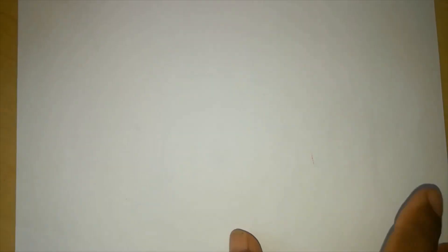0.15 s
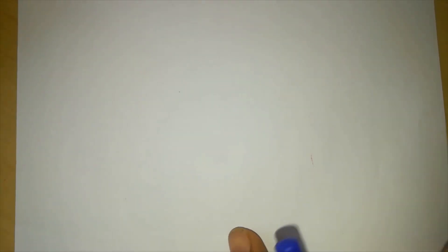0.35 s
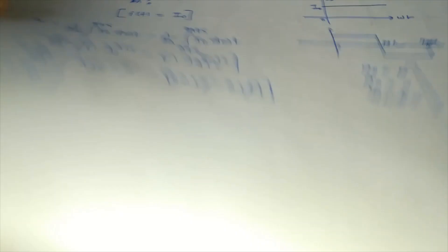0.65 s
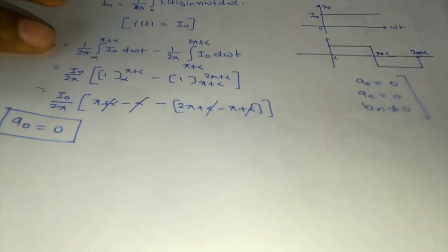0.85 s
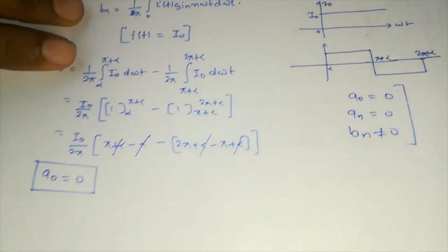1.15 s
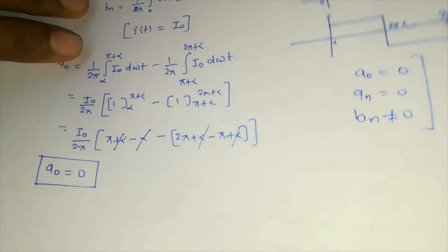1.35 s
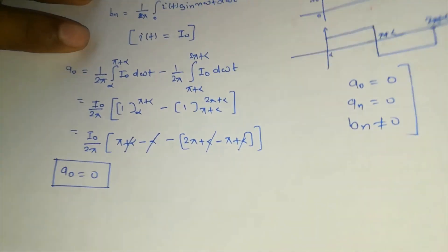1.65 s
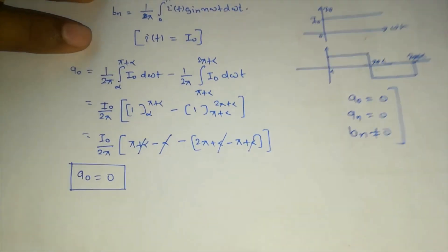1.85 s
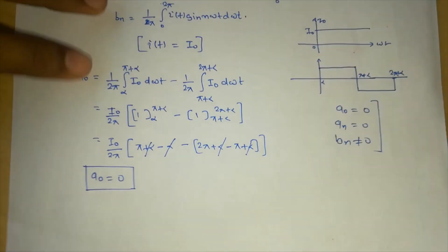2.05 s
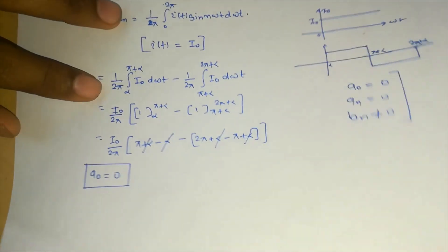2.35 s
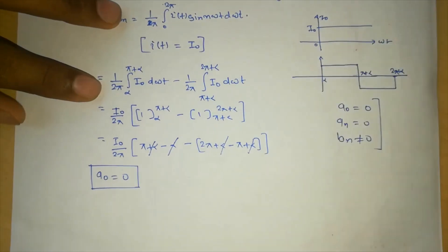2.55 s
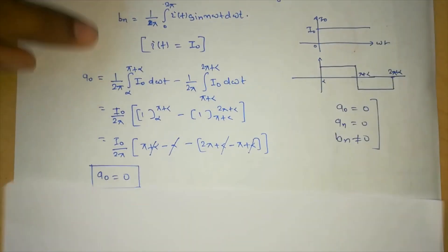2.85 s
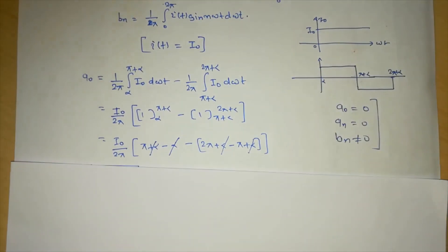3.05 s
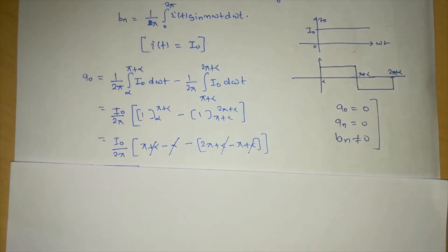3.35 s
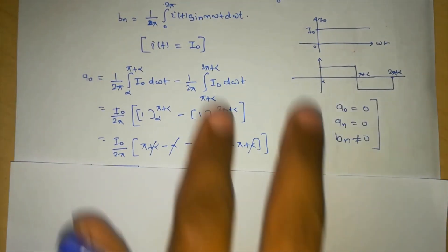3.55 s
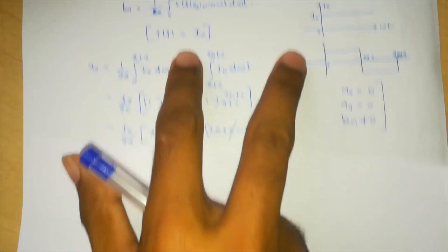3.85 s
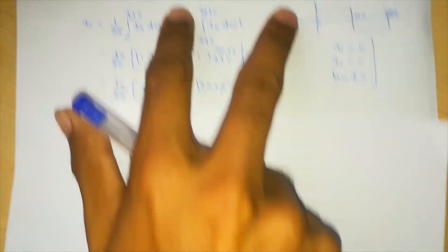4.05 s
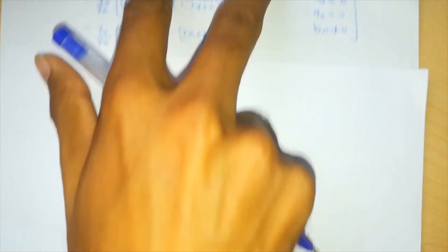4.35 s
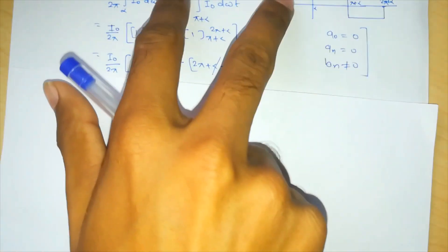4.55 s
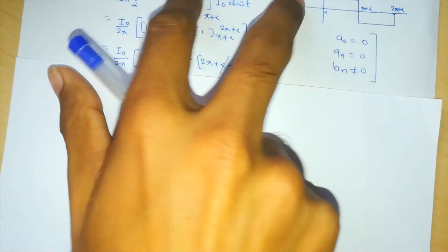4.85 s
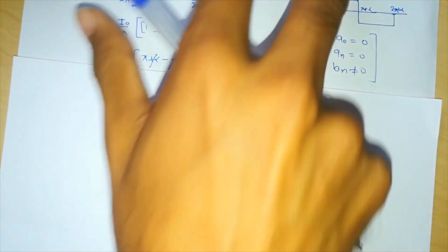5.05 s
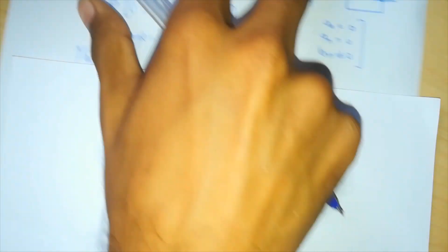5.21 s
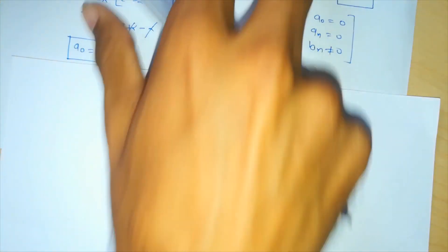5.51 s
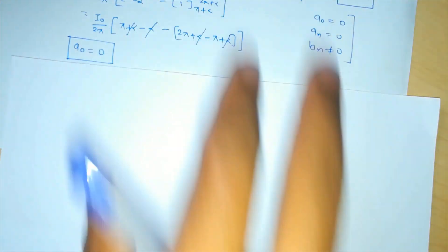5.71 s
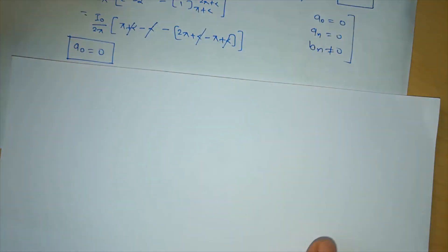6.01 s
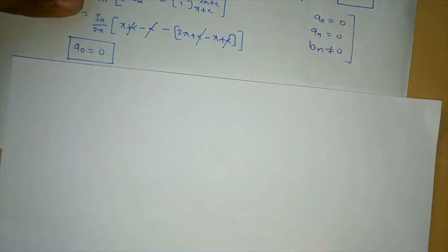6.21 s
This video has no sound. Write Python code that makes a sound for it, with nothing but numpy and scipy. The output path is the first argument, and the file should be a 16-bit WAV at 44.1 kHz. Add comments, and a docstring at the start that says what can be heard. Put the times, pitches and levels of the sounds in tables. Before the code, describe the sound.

A sheet of paper slides and rustles over other pages on a desk, with crisp snaps and a few dull knocks.

```python
"""A desk in a quiet room, close up: a hand slides a sheet of paper over other pages.
Fibres catch and let go as a grainy hiss, and the sheet buckles with sharp snaps. At first it wobbles
in the air and squeaks under a finger; later fingertips brush the page. The desk knocks and rumbles
dully, and a low room hum and the microphone's own hiss lie beneath."""
import sys
import numpy as np
from scipy import signal
from scipy.io import wavfile
from scipy.ndimage import uniform_filter1d

SR = 44100
rng = np.random.default_rng(int(sys.argv[2]) if len(sys.argv) > 2 else 0)


def put_to_file(sound):
    """Save the sound as 16-bit audio at rate SR, in the file named by the first command-line argument."""
    columns = np.atleast_2d(sound).T  # one column per channel
    safe = np.clip(columns, -1, 1)
    whole_steps = np.round(safe * 32767)
    wavfile.write(sys.argv[1], SR, whole_steps.astype(np.int16))


N = 281181


def amp(db):
    """Decibels to gain."""
    return 10 ** (np.asarray(db) / 20)


def unit_rms(x):
    """Scales to rms 1."""
    return x / np.sqrt(np.mean(x ** 2) + 1e-20)


def curve_at(points, hz):
    """Reads a table of (frequency, value) on a log-frequency axis."""
    point_hz, value = np.transpose(points)
    return np.interp(np.log(hz + 1), np.log(point_hz + 1), value)


def impulse_response(spectrum):
    """Minimum-phase filter of energy 1, falling to -80 dB an octave outside the spectrum table."""
    closed = [(spectrum[0][0] / 2, -80)] + list(spectrum) + [(spectrum[-1][0] * 2, -80)]
    log_gain = np.log(amp(curve_at(closed, abs(np.fft.fftfreq(4096, 1 / SR)))))
    phase = -signal.hilbert(log_gain).imag
    taps = np.fft.ifft(np.exp(log_gain + 1j * phase)).real[:1024]
    return taps / np.linalg.norm(taps)


def add(mix, start, sound):
    """Mixes a sound in at start seconds."""
    part = mix[round(start * SR):][:len(sound)]
    part += sound[:len(part)]


def drift(samples):
    """Smooth random wandering of rms 1; more samples make it slower."""
    return unit_rms(uniform_filter1d(uniform_filter1d(rng.standard_normal(N), samples), samples))


def resonate(x, hz, width_hz):
    """A resonance that can glide: shifts hz down to zero, smooths, and shifts back."""
    carrier = np.exp(2j * np.pi * np.cumsum(hz * np.ones(len(x))) / SR)
    pole = np.exp(-np.pi * width_hz / SR)
    return 2 * (carrier * signal.lfilter([1 - pole], [1, -pole], x / carrier + 1e-18)).real


def envelope(start, length, first_db, last_db):
    """Gain with a fast attack, a ramp from one level to another and a slower release."""
    attack_db_per_s, release_db_per_s = 2500, 500.5
    t = np.arange(N) / SR - start
    held_db = first_db + (last_db - first_db) * np.clip(t / length, 0, 1)
    fade_db = attack_db_per_s * np.maximum(-t, 0) + release_db_per_s * np.maximum(t - length, 0)
    return amp(held_db - fade_db)


# Colour of the background bed: (frequency [Hz], relative level [dB])
ROOM_SPECTRUM = [(15, -23), (30, -3.5), (80, -0.5), (130, -3.5), (290, -12.5), (500, -20.5), (900, -21),
                 (2000, -25.5), (5000, -30), (6400, -33), (7400, -39.5), (10000, -36.5), (14500, -33.5),
                 (16000, -34.5)]


def room_tone():
    """Low room noise and microphone hiss, gently swelling and fading in patches of the spectrum."""
    frames, hz = N // 512 + 5, np.fft.rfftfreq(2048, 1 / SR)
    real, imag, patches = rng.standard_normal((frames, len(hz), 3)).T
    patches_db = 1.8 * unit_rms(uniform_filter1d(uniform_filter1d(patches, 14, 0), 8, 1))
    spectra = (real + 1j * imag) * amp(curve_at(ROOM_SPECTRUM, hz)[:, None] + patches_db)
    bed = signal.istft(spectra, nperseg=2048, noverlap=1536)[1][:N]
    return amp(-60.5) * unit_rms(bed)


# Swells of a faint hum: (time [s], length [s], start level [dB], end level [dB])
HUM_SWELLS = [(1.445, 0.19, -67.5, -66), (1.914, 0.32, -62.5, -68.5), (2.949, 0.51, -72.5, -73),
              (3.75, 0.11, -76, -62.5)]


def hum():
    """A low, narrow band of noise that wavers, coming and going."""
    band = unit_rms(resonate(rng.standard_normal(N), hz=278, width_hz=25))
    return sum(envelope(*row) for row in HUM_SWELLS) * band


# The room's reverb: (frequency [Hz], time to fall by 60 dB [s])
REVERB_DECAY = [(500, 0.17), (1500, 0.2), (5000, 0.23), (12000, 0.61)]


def reverb(send):
    """A diffuse tail that starts after 10 ms, each band dying at its own speed."""
    hz, t, spectra = signal.stft(rng.standard_normal(SR // 2), SR, nperseg=256)
    decay_s = np.maximum(curve_at(REVERB_DECAY, hz), 0.05)
    tail = signal.istft(spectra * amp(-60 * t / decay_s[:, None]), SR, nperseg=256)[1]
    delayed_tail = np.concatenate([np.zeros(440), tail / np.linalg.norm(tail)])
    return signal.fftconvolve(send, delayed_tail)[:N]


# Knocks on the desk top: (time [s], level [dB], pitch [Hz])
DESK_KNOCKS = [(0.141, -30, 245), (0.227, -23, 189), (0.313, -27, 470), (0.412, -36.5, 252),
               (0.571, -37.5, 484), (0.671, -36.5, 310), (0.714, -34, 537), (0.895, -38.5, 299),
               (3.348, -49.5, 444), (3.864, -33, 687), (3.822, -37, 710), (3.83, -46, 168),
               (3.867, -42.5, 270), (5.077, -46.5, 205.5), (5.626, -50, 456)]
# Rumble under the pages: (time [s], length [s], start level [dB], end level [dB])
DESK_RUMBLES = [(0.0, 0.048, -49, -62), (0.24, 0.33, -46, -61), (0.638, .85, -49, -61),
                (3.82, .1, -52.5, -59), (6.0, .25, -56.5, -64)]


def desk():
    """Each knock is one damped tone; the desk and the air under the dragged pages rumble."""
    knocks, t = np.zeros(N), np.arange(4000) / SR
    attack = 1 - np.exp(-t / 0.00083)
    for start, db, hz in DESK_KNOCKS:
        add(knocks, start, amp(db - 60 * t / 0.045) * attack * np.sin(2 * np.pi * hz * t))
    low_band = signal.butter(2, (25, 125), "band", fs=SR, output="sos")
    rumble = unit_rms(signal.sosfilt(low_band, rng.standard_normal(N)))
    return knocks + sum(envelope(*row) for row in DESK_RUMBLES) * rumble


# Wobble of the lifted sheet: (time [s], level [dB], pitch [Hz])
WOBBLE_CURVE = [(0.08, -62, 215.3), (0.142, -44.5, 221.6), (0.204, -51, 189.7), (0.23, -46, 185),
                (0.264, -42.5, 180), (0.328, -44, 179.4), (0.38, -55.5, 158), (0.414, -55, 204.2),
                (0.45, -45, 215.7)]


def wobble():
    """A bending mode and its fifth, shaken unevenly; the pitch follows the curve of the sheet."""
    times, db, hz = np.transpose(WOBBLE_CURVE)
    t = np.arange(N) / SR
    fade = np.clip(np.minimum(t - times[0], times[-1] - t) / 0.01, 0, 1)
    pitch_hz = np.interp(t, times, hz) * (1 + 0.16 * drift(330))
    phase = 2 * np.pi * np.cumsum(pitch_hz) / SR
    tone = unit_rms(np.sin(phase) + 0.5 * np.sin(1.5 * phase))
    level_db = np.interp(t, times, db) + 2.5 * drift(390)
    return fade * amp(level_db) * tone


# Squeaks of the taut sheet: (time [s], length [s], start level [dB], end level [dB], pitch [Hz])
FINGER_SQUEAKS = [(0.005, 0.018, -41.5, -54.5, 2520), (0.044, 0.031, -48, -49, 2570),
                  (0.71, 0.03, -38.5, -44, 2790)]


def fingers():
    """One bright brush of skin on paper, and stick-slip squeaks with their octave."""
    sheen = resonate(rng.standard_normal(N), hz=12300, width_hz=2200)
    sheen = unit_rms(resonate(sheen, hz=11500, width_hz=2200))
    out = envelope(start=3.45, length=0.19, first_db=-68, last_db=-67) * sheen
    for *gesture, hz in FINGER_SQUEAKS:
        slip = rng.standard_normal(N)
        fundamental = unit_rms(resonate(slip, hz, width_hz=90.8))
        octave = unit_rms(resonate(slip, 2 * hz, width_hz=160))
        out += envelope(*gesture) * (fundamental + 0.53 * octave)
    return out


def flex(x, depth_db):
    """The bending sheet's resonances drift: brief patches in time and pitch swell or fade."""
    _, _, spectra = signal.stft(x, SR, nperseg=512, noverlap=384)
    patches = rng.standard_normal(spectra.shape)
    patches = unit_rms(uniform_filter1d(uniform_filter1d(patches, 4, 0), 14, 1))
    return signal.istft(spectra * amp(depth_db * patches), SR, nperseg=512, noverlap=384)[1][:N]


# The paper's voices, dark to bright: loose area, pressed middle, rubbing edge and fibre fizz.
# Each is (frequency [Hz], relative level [dB])
LOOSE_SPECTRUM = [(350, -14), (550, -12), (700, -4), (850, -6.5), (1050, -1.5), (1250, -5.5), (1700, -5),
                  (2300, -14.5)]
MIDDLE_SPECTRUM = [(1300, -29), (1900, -6.5), (2500, -1), (3200, 0.5), (3800, -4), (4800, -31.5)]
EDGE_SPECTRUM = [(2500, -22), (3500, -5.5), (4200, -0.5), (4870, 0), (5500, -2), (6150, -4.5), (6700, -10),
                 (7200, -14.5), (7800, -33.5), (9000, -47.5)]
FIZZ_SPECTRUM = [(6500, -17.5), (7800, -2.5), (9000, -6), (10000, -1), (11500, -5), (13500, -7),
                 (14800, -6), (16000, -12.5)]
# Strokes of the sheet, several in a row for a long slide: (time [s], length [s], edge start level [dB],
# edge end level [dB], middle [dB re edge], loose [dB re edge], fizz [dB re edge], edge pitch [Hz])
SLIDE_STROKES = [(0.0, .04, -48, -53, -2.5, 4.5, -31, 5000),
                 (0.045, 0.05, -42.5, -41, -8.5, -11, -30, 4800),
                 (0.111, 0.15, -43, -54, -7.5, -3, -21, 5100), (0.275, 0.041, -46, -46, -9, 2, -14, 5000),
                 (0.312, 0.049, -36, -40, -0.5, 5, -18.5, 4890),
                 (0.39, .07, -39.5, -45.5, -2, -6, -18, 4410),
                 (0.465, 0.036, -46, -53, 1.5, -6.5, -35, 4350),
                 (0.513, .145, -49, -43.5, -1, -1, -23.5, 4600),
                 (0.666, .05, -38.5, -42, -3, -4, -22, 4810), (0.719, 0.062, -32, -38, -5.5, -7, -23, 5550),
                 (0.8, .06, -50.5, -61, -1.5, -3, -30, 5100), (0.863, 0.11, -46, -53.5, -2, -11, -29, 5100),
                 (0.965, 0.092, -38.5, -31, -9, -10.5, -22, 4800),
                 (1.065, .1, -29.5, -26, -10.5, -14, -20, 4850),
                 (1.165, 0.051, -24.5, -22.5, -17, -19, -24, 5600),
                 (1.23, 0.049, -34.5, -41.5, -7, -13, -15.5, 5100),
                 (1.289, 0.066, -38, -35.5, -7.5, -18.5, -17.5, 4870),
                 (1.377, 0.081, -37, -42.5, -7.5, -19, -22, 4910),
                 (1.47, .39, -55, -60.5, -5, -9.5, -17, 4880),
                 (1.868, .07, -56, -55.5, -1, -8.5, -19, 4720),
                 (1.985, 0.28, -63, -78, -1.5, -5, -13, 4700),
                 (2.047, .05, -53, -58.5, -1.5, -7, -22.5, 4800),
                 (2.44, .12, -58.5, -59.5, -20, -10, -17, 5360), (2.6, .07, -70, -71, -8, -7, -12, 5200),
                 (2.642, .035, -66, -72, 0, 15.5, -15, 5000), (2.753, .03, -63.5, -71, 5.5, 0, -10.5, 5190),
                 (3.33, .155, -68, -52.5, -11, -14.5, -16, 5610),
                 (3.485, .225, -57, -54, -6.5, -16, -11, 5300),
                 (3.715, 0.073, -47.5, -46.5, -8.5, -11, -13.5, 5070),
                 (3.802, 0.053, -44, -45, -1, -11.5, -17.5, 4360),
                 (3.888, 0.047, -50.5, -59, 3, 0, -18, 4400), (3.935, .11, -55, -49, 2.5, -12, -16.5, 4610),
                 (4.057, 0.027, -38.5, -43.5, 0.5, -15.5, -23.5, 4450),
                 (4.095, .07, -56.5, -65.5, -3, -12, -13, 4600),
                 (4.239, .06, -64.5, -67, -16.5, -13.5, -12, 4740),
                 (4.323, .025, -46, -47.5, 0, -27, -30, 4400),
                 (4.352, 0.082, -50, -65, 0, -12, -17.5, 4300),
                 (4.75, .02, -59, -58, -22, -17, -13.5, 4900),
                 (4.771, 0.15, -48.5, -46.5, -9, -22.5, -18, 4595),
                 (5.029, .07, -66, -49.5, -3.5, -12, -19, 4300),
                 (5.11, .06, -69, -78.5, 16.5, 6, -11.5, 4360), (5.3, .26, -78, -67, -5, -3.5, -13, 4300),
                 (5.628, .1, -57, -68.5, -11, -1.5, -17, 4900), (5.84, .1, -71, -68, -14, -16, -12.5, 4750),
                 (5.946, .16, -55.5, -48, -4, -18, -17, 4500),
                 (6.111, 0.12, -48.5, -44, -4, -14.5, -17, 4670),
                 (6.32, .06, -64.5, -61, -11.5, -23, -11, 5080)]


def sliding():
    """Catching fibres excite every part of the sheet; pressure comes in clumps."""
    start, length, _, _, middle_db, loose_db, fizz_db, hz = np.transpose(SLIDE_STROKES)
    stroke_power = np.array([envelope(*row[:4]) for row in SLIDE_STROKES]).T ** 2
    edge_hz = np.interp(np.arange(N) / SR, start + length / 2, hz)
    pressure = amp(1.9 * drift(25) + 0.74 * drift(300))
    voices = [(EDGE_SPECTRUM, np.zeros(len(start))), (MIDDLE_SPECTRUM, middle_db),
              (LOOSE_SPECTRUM, loose_db), (FIZZ_SPECTRUM, fizz_db)]
    out = np.zeros(N)
    for spectrum, db in voices:
        fibres = flex(rng.standard_normal(N), depth_db=2.4) * pressure
        if spectrum is EDGE_SPECTRUM:  # the free strip beside the contact shortens and lengthens
            fibres = resonate(fibres, edge_hz, width_hz=1900)
        hiss = unit_rms(signal.oaconvolve(fibres, impulse_response(spectrum))[:N])
        out += hiss * np.sqrt(stroke_power @ amp(db) ** 2)  # overlapping strokes add in power
    return out


# Body of a buckle: (frequency [Hz], relative level [dB])
BUCKLE_SPECTRUM = [(600, -31), (850, -11.5), (1050, -6.5), (1300, -5), (1600, -6), (1900, -9.5),
                   (2400, -15.5)]
# A snap shakes most the voice nearest its ring. Rows are buckle, middle, edge and fizz:
# (centre [Hz], relative level [dB], loss away from the centre [dB/octave])
SNAP_BLEND = [(1020, -2, 10), (2800, -5, 8.5), (5000, -2.5, 11.5), (5000, -25, 10)]
# Snaps and taps of the sheet: (time [s], peak level [dB], ring pitch [Hz], crackle [dB re click])
PAPER_SNAPS = [(0.278, -32.5, 5100, -2), (0.301, -15.5, 5500, 11), (0.306, -20, 1660, 0),
               (0.317, -13, 1020, -4), (0.319, -13.5, 4550, -14), (0.329, -17.5, 1600, -6),
               (0.348, -20.5, 1000, -3), (0.412, -11, 2240, -23), (0.513, -33, 1070, 7),
               (0.565, -30.5, 1720, -2), (0.602, -16, 1730, 5), (0.636, -32, 1070, -20),
               (0.719, -20, 2670, 5), (0.864, -35, 4300, -10), (0.97, -47, 4750, -19),
               (1.457, -32, 4860, -16), (2.032, -18, 1550, -25), (2.032, -22, 4470, -23),
               (2.425, -49.5, 5130, -15.5), (2.64, -50, 990, -3), (2.662, -42.5, 1290, 5),
               (2.753, -41.5, 3260, 8.5), (2.781, -46.5, 2230, -18), (3.715, -23.5, 5070, -28),
               (3.738, -27.5, 5300, -19), (3.791, -32, 3060, -5), (3.805, -25.5, 3240, -5),
               (3.818, -15, 3220, -26), (3.828, -26.5, 2160, -6), (3.865, -15, 2470, -19.5),
               (4.046, -21, 2630, -20), (4.06, -31, 3250, 2), (4.068, -36, 3650, -6),
               (4.081, -30.5, 3980, -2), (4.089, -36, 3750, -18), (4.248, -51, 4890, -5.5),
               (4.286, -48.5, 4040, -9), (4.327, -31.5, 2790, -15.5), (4.361, -27.5, 2880, -7),
               (4.749, -48, 5130, -5.5), (4.772, -33, 5400, -16), (4.98, -43.5, 1610, -10),
               (5.076, -27, 3230, -10), (5.082, -26, 2800, -13), (5.103, -31, 3220, -17),
               (5.579, -48.5, 1290, -8), (5.625, -40, 2640, -17.5), (5.668, -47.5, 4850, -9),
               (5.946, -39, 4340, -7), (5.964, -43, 4100, -6), (6.014, -31, 4700, -22),
               (6.11, -41, 4800, -14)]


def snaps():
    """A buckle flips in a click, crackles on for a moment and leaves a short hollow ring."""
    out, t = np.zeros(N), np.arange(3000) / SR
    spectra = (BUCKLE_SPECTRUM, MIDDLE_SPECTRUM, EDGE_SPECTRUM, FIZZ_SPECTRUM)
    filters = [impulse_response(spectrum) for spectrum in spectra]
    centre_hz, voice_db, loss_db = np.transpose(SNAP_BLEND)
    attack = 1 - np.exp(-t / 0.00062)
    click = amp(-60 * t / 0.0036)
    for start, peak_db, hz, crackle_db in PAPER_SNAPS:
        crackle = amp(crackle_db - 60 * t / 0.039)
        burst = rng.standard_normal(len(t)) * attack * (click + crackle)
        voices = [unit_rms(signal.fftconvolve(burst, taps)[:len(t)]) for taps in filters]
        gains = amp(voice_db - loss_db * abs(np.log2(hz / centre_hz)))
        body = unit_rms(gains @ np.array(voices))
        ring = unit_rms(resonate(resonate(burst, hz, width_hz=380), hz, width_hz=640))
        snap = body + 0.52 * ring
        add(out, start, amp(peak_db) * snap / abs(snap).max())
    return out


def scene():
    """Paper and desk up close over the room tone, with a little reverb on the snaps and the friction."""
    snapping = snaps()
    friction = sliding() + fingers()
    close = snapping + friction + wobble() + desk()
    room = reverb(amp(-19) * snapping + amp(-12) * friction)
    return (close + room + room_tone() + hum())[None]


def record(dry):
    """A steep low-pass trims the very top of the treble."""
    low_pass = signal.firwin(511, cutoff=15950, window=("kaiser", 9), fs=SR)
    return signal.oaconvolve(dry, low_pass[None], "same")


dry = scene()
out = record(dry)
put_to_file(out)
```